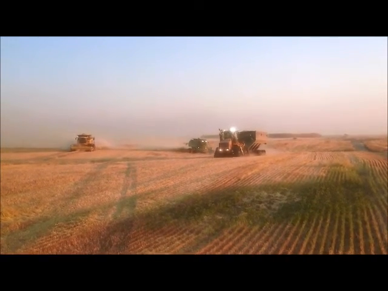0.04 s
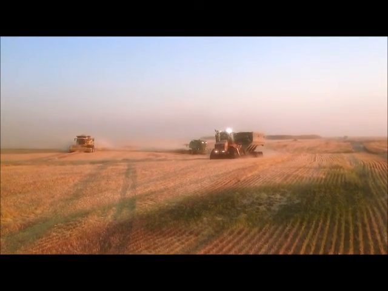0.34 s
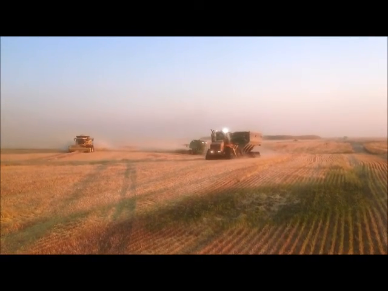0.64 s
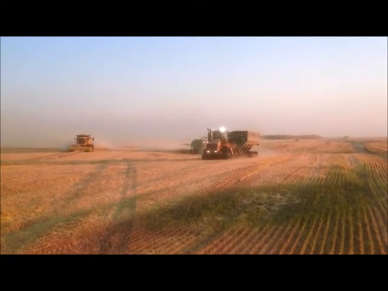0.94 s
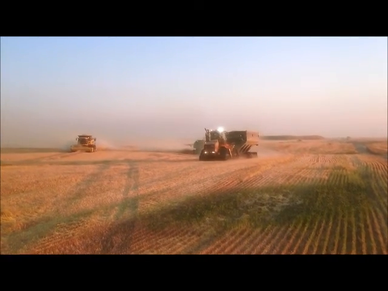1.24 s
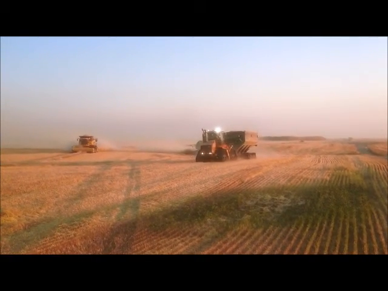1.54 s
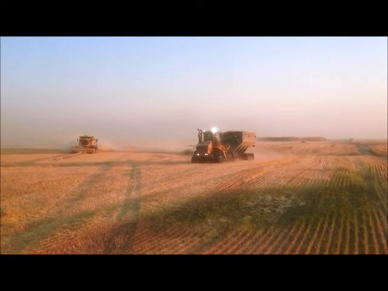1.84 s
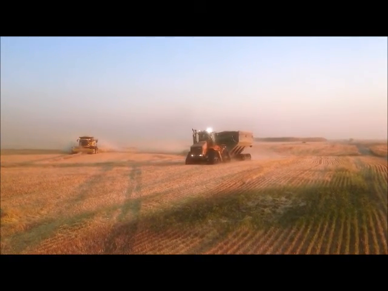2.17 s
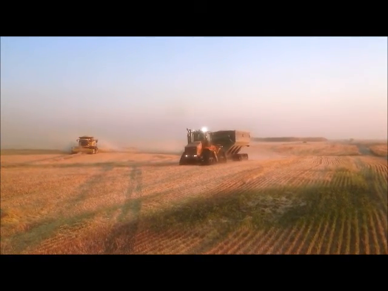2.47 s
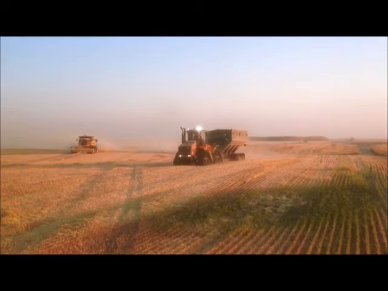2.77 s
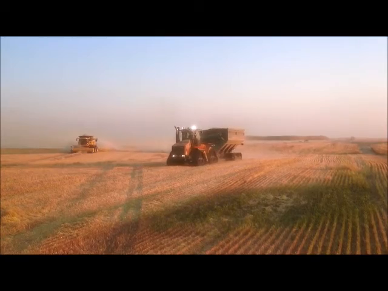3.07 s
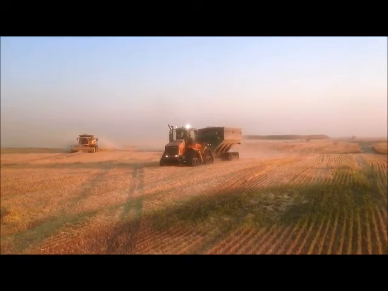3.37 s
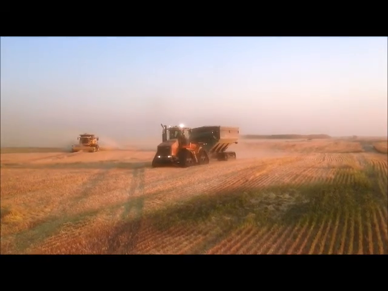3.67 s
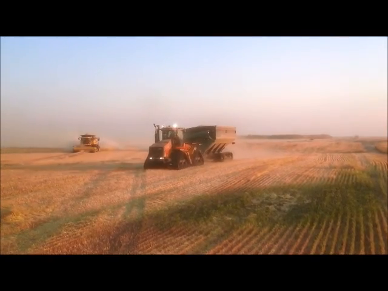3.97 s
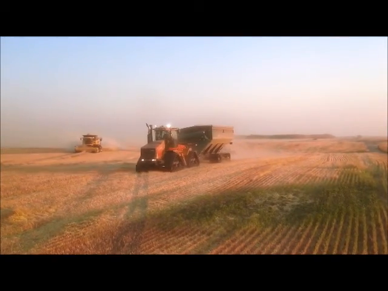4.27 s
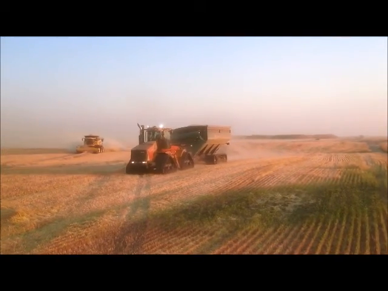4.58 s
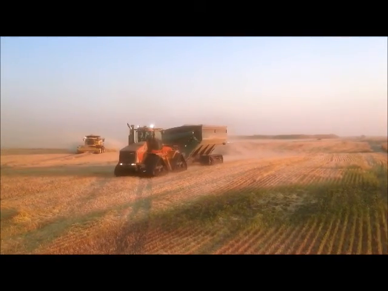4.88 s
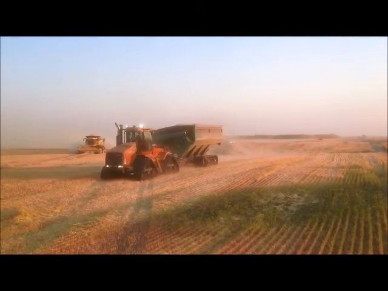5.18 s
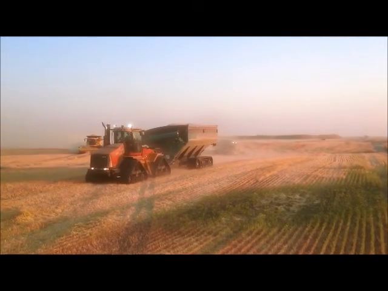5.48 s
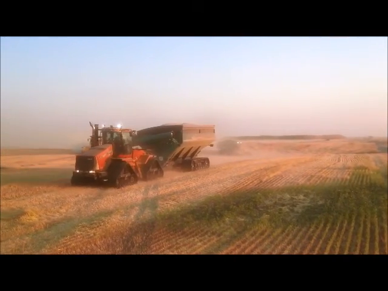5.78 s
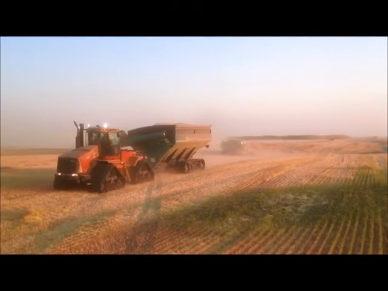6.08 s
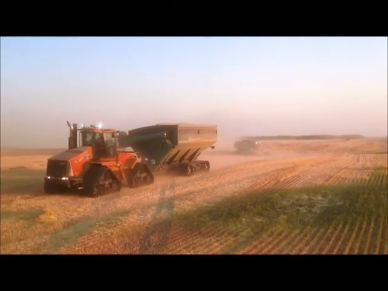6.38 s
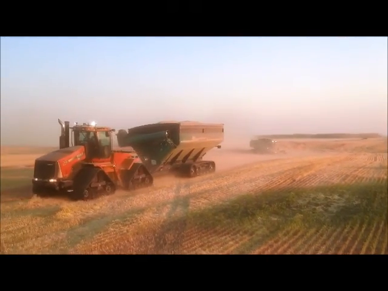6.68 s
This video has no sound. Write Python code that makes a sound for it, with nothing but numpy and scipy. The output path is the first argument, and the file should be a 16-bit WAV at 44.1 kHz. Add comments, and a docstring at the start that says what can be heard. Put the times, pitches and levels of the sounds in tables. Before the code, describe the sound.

A tracked tractor pulling a cart draws nearer outdoors, its engine rumbling and rattling under a thin turbo whistle and hiss.

```python
"""A six-cylinder diesel tractor on tracks hauls a grain cart across stubble towards one microphone.
The exhaust drones, block and panels clatter and air hisses with each firing; the engine gathers speed
and is pulled down by load near the end. The turbocharger whistles up and down over a drivetrain hum.
Out in the open field, the tracks rumble and jingle, and crushed straw crackles as they come close."""
import sys
import numpy as np
from scipy import signal
from scipy.fft import rfft, irfft, next_fast_len
from scipy.io import wavfile
from scipy.ndimage import uniform_filter1d, map_coordinates

SR = 44100
rng = np.random.default_rng(int(sys.argv[2]) if len(sys.argv) > 2 else 0)


def pcm_store(signal):
    """Save signal as 16-bit PCM."""
    levels = np.round(np.clip(np.atleast_2d(signal), -1, 1) * 32767)
    wavfile.write(sys.argv[1], SR, levels.astype(np.int16).T)


N = 300762
PRESSING_LOAD = 0.084  # load (0-1) around which the engine goes from slack to firm
RING_SINK_HZ_PER_S = 39  # squeals and jingles sink slowly in pitch


def undb(db):
    """Decibels to gain."""
    return 10 ** (np.asarray(db) / 20)


def unit(x):
    """Scale to rms 1."""
    return x / np.sqrt(np.mean(x ** 2))


def bell(x, centre, width):
    """A smooth hump, 1 at its centre."""
    return np.exp(-.5 * ((x - centre) / width) ** 2)


def curves(table):
    """The columns of a timed table, joined by straight lines."""
    s, *columns = np.transpose(table)
    return [np.interp(np.arange(N) / SR, s, c) for c in columns]


def walk(rate):
    """A smooth random waver, spread near 1, about rate turns a second."""
    step = max(int(SR / rate), 2)
    held = np.repeat(rng.standard_normal(N // step + 2), step)
    return 1.417 * uniform_filter1d(uniform_filter1d(held, step), step)[:N]


def spectrum_db(points, hz):
    """A spectrum read on a log-frequency axis."""
    f, db = np.transpose(points)
    return np.interp(np.log(hz + 1), np.log(f), db)


def colour(x, points):
    """Filter by a steady spectrum, to rms 1."""
    size = next_fast_len(N)
    hz = np.arange(size // 2 + 1) * SR / size
    return unit(irfft(rfft(x, size) * undb(spectrum_db(points, hz)), size)[:N])


def tone(turns, db, jitter):
    """A sine that follows a shaft's turns, with jitter radians of play in its phase."""
    phase = 2 * np.pi * (turns + rng.random()) + jitter * walk(45)
    return np.sqrt(2) * undb(db) * np.sin(phase)


def ringing(taps, hz, t60_s):
    """Taps with a soft contact ring one mode that dies away."""
    t = np.arange(int(.15 * SR)) / SR
    decay = undb(-60 * t / t60_s) * (1 - np.exp(-t / .0006))
    return np.imag(signal.fftconvolve(taps, decay)[:N] * np.exp(2j * np.pi * np.cumsum(hz) / SR))


def knocks(firings, depth, scatter_db, repeat):
    """Noise that swells once a firing; the share repeat recurs with every cycle of the six cylinders."""
    strength = undb(scatter_db * np.clip(rng.standard_normal(N // 100), -2, 2))[firings.astype(int)]
    swell = np.sin(np.pi * firings) ** 4
    pattern = rng.standard_normal(2700)
    place = (firings / 6 % 1) * len(pattern)
    recurring = map_coordinates(pattern, [place], order=3, mode="wrap")
    noise = np.sqrt(repeat) * recurring + np.sqrt(1 - repeat) * rng.standard_normal(N)
    return noise * (1 + depth * strength * swell)


def engine_load(t):
    """Load and extra knock at times t: the engine pulls to gather speed, then much harder near the end."""
    # Each row: start, attack, hold and release in seconds, load from 0 to 1, extra knock in dB.
    pulls = [(1.145, 0.29, 1.42, 0.79, 0.28, 4), (5.62, 0.3, 0.24, 1.75, 0.89, -0.5)]
    load, knock_db = 0, 0
    for start, attack, hold, release, strength, db in pulls:
        shape = np.interp(t, start + np.cumsum([0, attack, hold, release]), [0, 1, 1, 0])
        load, knock_db = load + strength * shape, knock_db + db * shape
    return load, knock_db


def stubble(crackle_db=1.5):
    """Dry straw crushed under the tracks: a fine, high crackle."""
    # Each row: frequency in Hz, relative level in dB.
    straw_spectrum = [(5000, -30), (8000, -3), (9300, 3), (11400, 7.5), (12500, -17), (15500, -9)]
    return colour(rng.standard_normal(N) * undb(crackle_db * walk(600)), straw_spectrum)


def thrum(hz=161, half_width_hz=22, at_s=3.8, spread_s=0.61, db=-42):
    """A low, hollow rumble swells and fades as the tractor draws near."""
    band = signal.butter(2, [hz - half_width_hz, hz + half_width_hz], "bandpass", fs=SR, output="sos")
    swell = bell(np.arange(N) / SR, at_s, spread_s)
    return undb(db) * swell * unit(signal.sosfilt(band, rng.standard_normal(N)))


def tracks():
    """Rubber tracks and the cart rumble over the field."""
    # Each row: frequency in Hz, relative level in dB.
    rumble_spectrum = [(30, -34), (60, -12), (85, -29), (115, 1.5), (160, 4.5), (205, -0.5), (275, 8.5),
                       (370, 8), (440, 4), (510, 5), (580, 6), (790, 2.5), (950, -0.5), (2000, -43)]
    return colour(rng.standard_normal(N), rumble_spectrum)


def jingle(lugs_per_s=27, lug_jitter=.2, scatter_db=2.2):
    """Track lugs tap the wheels almost regularly and ring steel parts; each ring swells and fades."""
    # Each row: loudest moment and spread in seconds, pitch in Hz, level in dB.
    rings = [(.2, 0.28, 1674, -39), (.82, 0.31, 1625, -38), (3.2, .36, 1730, -32.5),
             (3.85, 0.24, 1634, -33), (2.95, 0.36, 1315, -39), (4.0, 0.24, 1265, -36),
             (5.65, .25, 1763, -41), (6.76, .12, 1674, -32)]
    t = np.arange(N) / SR
    out = 0
    for at, spread, hz, db in rings:
        offset, size, angle = rng.standard_normal((N // 100, 3)).T
        place = ((np.arange(len(offset)) + lug_jitter * offset) / lugs_per_s * SR).astype(int)
        heard = (place >= 0) & (place < N)
        taps = np.zeros(N, complex)
        taps[place[heard]] = (undb(scatter_db * size) * np.exp(1j * np.pi * angle))[heard]
        ring = ringing(taps, hz - RING_SINK_HZ_PER_S * (t - at), t60_s=.07)
        out = out + undb(db) * bell(t, at, spread) * unit(ring)
    return out


def clanks(hz=1697):
    """A few harder blows of the tracks stand out of the jingle."""
    # Each row: time in seconds, strength of the blow in dB.
    hard_blows = [(3.203, -11), (3.432, -14), (3.470, -16), (3.763, -21), (3.801, -17)]
    taps = np.zeros(N)
    for at, db in hard_blows:
        taps[int(at * SR)] = undb(db)
    return ringing(taps, np.full(N, hz), t60_s=.035)


def gears(firings):
    """The drivetrain hums in step with the engine; close side lines make it throb."""
    # Each entry: one line of the hum as a multiple of the firing rate.
    orders = [16 / 3, 11 / 2, 17 / 3, 5.852, 6, 37 / 6, 19 / 3, 7]
    # Each entry: that line's level in dB against the strongest.
    lines_db = [-11, -13, -10, 0, -5.5, -11, -9, -13]
    # Each row: time in seconds, level of the strongest line in dB.
    hum_levels = [(0.25, -38), (0.7, -43), (2.3, -45.5), (2.8, -42), (4, -36), (4.5, -34), (5, -33),
                  (5.64, -31), (5.8, -42), (6.5, -46)]
    hum_db, = curves(hum_levels)
    return sum(tone(k * firings, hum_db + db + 0.8 * walk(12), jitter=.1)
               for k, db in zip(orders, lines_db))


def turbo(firings, inertia_s=0.153, smear_rad=.5, crank_throb=.25, firing_throb=.2):
    """The compressor's blade tone glides, throbs with crank and exhaust pulses and flickers in hot air."""
    # Each row: time in seconds, pitch in Hz.
    whistle_pitch = [(0.02, 9070), (0.57, 8900), (0.8, 8640), (1.25, 7990), (1.52, 7790), (1.87, 7970),
                     (2.26, 8380), (2.76, 8830), (3.4, 9130), (4.03, 9040), (4.6, 8640), (5.2, 8240),
                     (5.55, 8050), (5.92, 7760), (6.33, 7790), (6.82, 8470)]
    # The whistle stands out and sinks back into the hiss. Each row: time in seconds, level in dB.
    whistle_levels = [(0.05, -53.5), (0.5, -49.5), (1.0, -55.5), (1.3, -53.5), (1.62, -56), (1.95, -50),
                      (2.2, -55), (2.74, -43.5), (3.33, -56), (3.7, -48), (4.02, -42), (4.2, -45),
                      (4.7, -44), (5.08, -44), (5.33, -40), (5.7, -47.5), (5.95, -44), (6.3, -47),
                      (6.45, -40), (6.8, -46)]
    hz, = curves(whistle_pitch)
    db, = curves(whistle_levels)
    hz = uniform_filter1d(hz, int(inertia_s * SR), mode="nearest") + 8 * walk(25)
    phase = 2 * np.pi * np.cumsum(hz) / SR + smear_rad * walk(120)
    throb = 1 + crank_throb * np.sin(np.pi * firings) + firing_throb * np.sin(2 * np.pi * firings)
    flicker = undb(2.6 * walk(95) + 1.5 * walk(22))
    return undb(db) * unit(np.sin(phase) * throb * flicker)


def air(firings, alternation=0.052, echo_gain=0.24, far_lag_s=.0019, near_lag_s=.0024):
    """Rushing air pulses with the firings, every other one stronger; its ground echo lags more close up."""
    # Each row: frequency in Hz, relative level in dB.
    hiss_spectrum = [(2500, -35), (3800, -2), (4600, 5.5), (5400, -5.5), (6350, 8.5), (7450, 7.5),
                     (7950, 1.5), (9100, -3), (9800, -14.5), (11400, -1.5), (12500, -13), (15500, -25)]
    pulsed = knocks(firings, depth=0.44, scatter_db=5.5, repeat=0.058)
    pulsed *= 1 + alternation * np.sin(np.pi * firings)
    lag = np.linspace(far_lag_s, near_lag_s, N) * SR
    ground_echo = map_coordinates(pulsed, [np.arange(N) - lag], order=3)
    return colour(pulsed + echo_gain * ground_echo, hiss_spectrum)


def reflections_db(hz, t):
    """Reflections off ground and bodywork comb the clatter; their lags slide as the tractor nears."""
    # Each row: strongest moment and spread in seconds, lag at that moment in ms,
    # lag growth in ms per second, ripple in dB (negative is inverted).
    paths = [(.3, 0.4, 1.54, 0.035, -1.2), (.94, 3.1, 1.843, 0.205, 2.5), (2.72, 1.5, 1.933, 0.15, -1.5),
             (2.87, 1.3, 2.338, 0.054, 1.7), (6.8, 5, 1.5, -0.0354, 2)]
    db = 0
    for at, spread, lag_ms, growth, ripple_db in paths:
        lag_s = (lag_ms + growth * (t - at)) / 1000
        db = db + ripple_db * bell(t, at, spread) * np.cos(2 * np.pi * hz * lag_s)
    return db


def hollow_db(hz, t, turn_at_s=3.83, creep_hz_per_s=28, rise_hz_per_s=175):
    """A hollow in the treble creeps up, then rises faster once the machine is side-on to the microphone."""
    since_turn = t - turn_at_s
    centre_hz = 2687 + creep_hz_per_s * since_turn + rise_hz_per_s * np.maximum(since_turn, 0)
    return -6 * bell(hz, centre_hz, width=57)


def squeals_db(hz, t):
    """The machinery squeals in narrow rings that sink a little as they swell and fade."""
    # Each row: loudest moment and spread in seconds, centre and width in Hz, lift in dB.
    squeals = [(.2, .25, 565, 20, 5), (.8, 0.38, 1630, 23, 2.5), (4.1, 0.5, 820, 49, 3),
               (4.4, 0.61, 1575, 32, 4.5)]
    return sum(lift * bell(t, at, spread) * bell(hz, centre - RING_SINK_HZ_PER_S * (t - at), width)
               for at, spread, centre, width, lift in squeals)


def clatter(firings, flutter_db=0.48, chatter_db=1.4, slack_db=5.5, pressed_db=6):
    """Combustion knock and gear rattle, radiated by the block and panels."""
    # Each row: frequency in Hz, relative level in dB.
    knock_spectrum = [(250, -33.5), (450, -12.5), (580, -2), (760, -3.5), (950, -1), (1150, 0),
                      (1450, -0.5), (1950, -2.5), (2500, -10.5), (3200, -9), (4000, -17), (5000, -22.5),
                      (7000, -50)]
    # Resonances of block and panels. Each row: centre and width in Hz, lift or dip in dB.
    resonances = [(742, 93, 3.5), (926, 26, -4), (1097, 43, 4.5), (1440, 46, -1), (1638, 66, 4),
                  (1774, 43, 2), (2340, 120, 5), (3340, 25, 1.5)]
    knock = knocks(firings, depth=0.3, scatter_db=2.0, repeat=0.094) * undb(flutter_db * walk(30))
    hz, t, frames = signal.stft(knock, SR, nperseg=1536)
    hz = hz[:, None]
    load, knock_db = engine_load(t)
    rattle_db = pressed_db + (slack_db - pressed_db) * bell(load, 0, PRESSING_LOAD)
    panels_db = sum(lift * bell(hz, centre, width) for centre, width, lift in resonances)
    db = spectrum_db(knock_spectrum, hz) + panels_db
    db = db + reflections_db(hz, t) + squeals_db(hz, t) + hollow_db(hz, t)
    db += knock_db * bell(hz, 2570, width=430)  # the knock hardens as the engine gathers speed
    db += rattle_db * bell(hz, 587, width=30)  # gear teeth rattle in their casing
    gain = undb(db) / np.sqrt(np.mean(undb(db) ** 2, axis=0))  # the colour moves, the power stays
    # The main ring of the panels comes in uneven bursts.
    chatter = undb(chatter_db * bell(hz, 1580, width=260) * rng.standard_normal(len(t)))
    return unit(signal.istft(frames * gain * chatter, SR)[1][:N])


def lope(firings, base_db, waver_db=2.5):
    """Unequal cylinders add weaker lines on multiples of the six-firing cycle."""
    # Each entry: one line as a multiple of the cycle rate.
    orders = [7, 9, 10, 13, 14, 15, 21, 22, 26, 28, 60, 81, 100]
    # Each entry: that line's level in dB against base_db.
    lines_db = [-23.5, -21, -17.5, -25, -31, -23.5, -30, -22.5, -27.5, -24.5, -19.5, -16, -13.5]
    return sum(tone(k / 6 * firings, base_db + db + waver_db * walk(9), jitter=0.28)
               for k, db in zip(orders, lines_db))


def exhaust(firing_hz, firings, drone_db, ragged_db=2.1, ragged_rad=.2, firm_share=.45, waver_db=0.4):
    """Exhaust tones drone on the firing rate, firm under load and ragged when the engine runs light."""
    # Each entry: one tone as a multiple of the firing rate.
    orders = [1, 2, 8 / 3, 17 / 6, 3, 19 / 6, 10 / 3, 4, 5]
    # Each entry: that tone's level in dB against drone_db, ahead of the muffler.
    tones_db = [1.5, 6, 1.5, -9, 3.5, -11, 3, 2.5, -2.5]
    # Each entry: what full load adds to that tone in dB.
    boosts_db = [-4, -2, 6, 8, 10.5, 13, 5.5, 4, 7]
    # The muffler passes or swallows each tone as the speed moves it. Each row: frequency in Hz, gain in dB.
    muffler = [(88, 1), (93, -0.5), (100, -0.5), (175, -13), (181, 0.5), (188, 2.5), (197, -3),
               (204, -15.5), (242, -14), (256, -17), (264, -4.5), (273, 2.5), (296, 2.5), (309, -1.5),
               (335, -7), (350, -9), (364, -2.5), (378, -5.5), (395, -6), (440, -16), (485, -4), (520, -7)]
    load, _ = engine_load(np.arange(N) / SR)
    slack = firm_share + (1 - firm_share) * bell(load, 0, PRESSING_LOAD)
    drone = 0
    for k, db, boost_db in zip(orders, tones_db, boosts_db):
        ragged = slack * min(k / 3, 1) ** 2  # the higher tones waver most
        level_db = drone_db + db + boost_db * load + spectrum_db(muffler, k * firing_hz)
        drone = drone + tone(k * firings, level_db + ragged_db * ragged * walk(28), ragged_rad * ragged)
    return drone * undb(waver_db * walk(40))


def scene():
    """One engine speed drives drone, clatter and hiss; all swell as the tractor nears the microphone."""
    # Each row: time in seconds, firing rate in Hz.
    engine_speed = [(0.0, 93.5), (0.55, 93.2), (1.5, 90.6), (2.05, 91.3), (3.0, 95.9), (3.95, 101),
                    (4.7, 102.8), (5.66, 103.7), (5.77, 98.3), (6.09, 98), (6.38, 87.9), (6.82, 90.5)]
    # Each row: time in seconds, then drone, clatter and hiss in dB, ahead of their trims in the mix.
    approach = [(0.1, -46, -26.5, -49.5), (0.52, -45.5, -27, -53), (1.2, -47, -31.5, -54.5),
                (1.91, -43, -30, -49), (2.73, -41, -24.2, -46), (3.25, -39, -23.5, -44.5),
                (3.88, -38.5, -22.7, -43.5), (4.56, -38.5, -24, -44), (5.22, -38, -24.5, -43.5),
                (5.8, -38.5, -25.5, -41.5), (6.22, -38, -23.5, -40.5), (6.72, -36.5, -21.5, -37.5)]
    firing_hz, = curves(engine_speed)
    firings = np.cumsum(firing_hz * (1 + 0.0013 * walk(18))) / SR  # running count of firings
    drone_db, clatter_db, hiss_db = curves(approach)
    # Tracks and cart are spread over the ground, so their rumble grows more gently than the drone.
    rumble_db = -28.5 + 0.63 * (drone_db - drone_db.mean())
    # Air swallows the highest treble, so the straw is heard only from close by.
    straw_db = -43.5 + 1.67 * (hiss_db - hiss_db.max())
    mix = (exhaust(firing_hz, firings, drone_db)
           + lope(firings, rumble_db)
           + undb(rumble_db - 5.5) * tracks()
           + undb(clatter_db + 1.0) * clatter(firings)
           + undb(hiss_db + 2.0) * air(firings)
           + undb(straw_db) * stubble()
           + jingle()
           + clanks()
           + gears(firings)
           + thrum()
           + turbo(firings))
    return mix[None]


def record(dry):
    """The microphone's chain cuts the top of the treble."""
    top_hz = 15300
    return signal.sosfilt(signal.ellip(10, .2, 80, top_hz, fs=SR, output="sos"), dry)


dry = scene()
out = record(dry)
pcm_store(out)
```